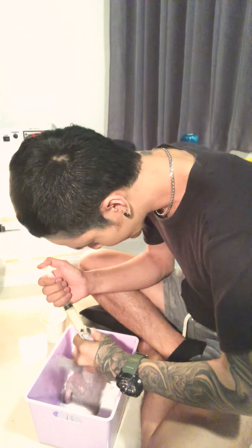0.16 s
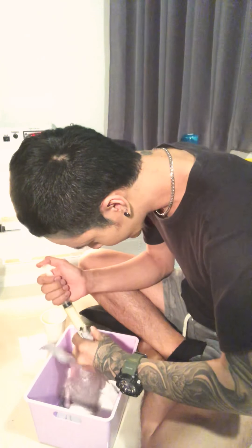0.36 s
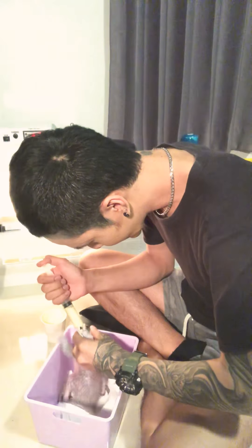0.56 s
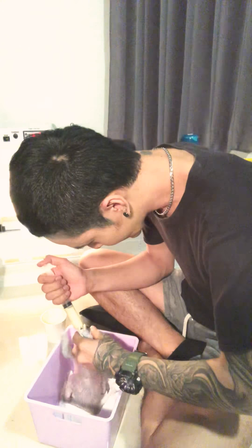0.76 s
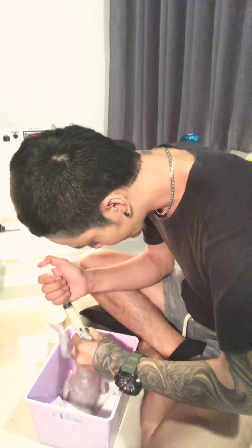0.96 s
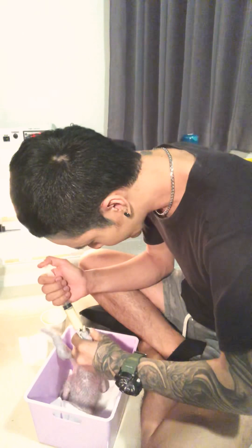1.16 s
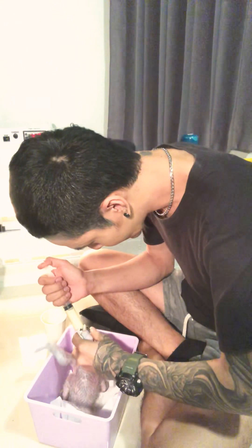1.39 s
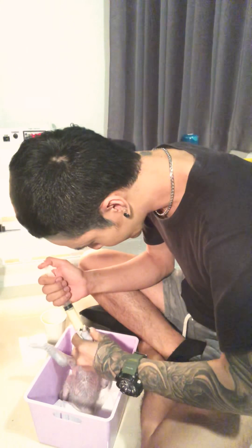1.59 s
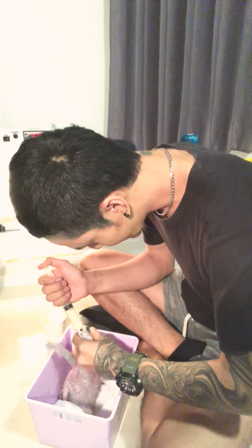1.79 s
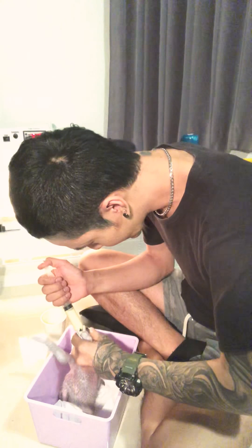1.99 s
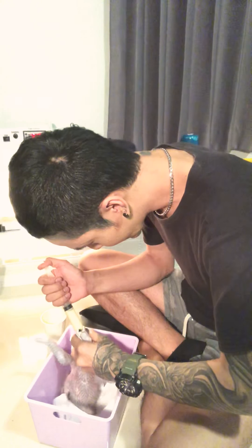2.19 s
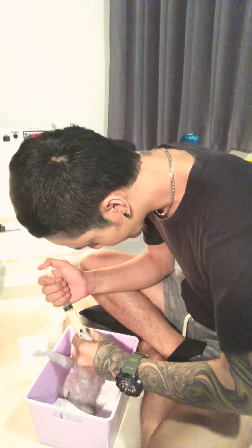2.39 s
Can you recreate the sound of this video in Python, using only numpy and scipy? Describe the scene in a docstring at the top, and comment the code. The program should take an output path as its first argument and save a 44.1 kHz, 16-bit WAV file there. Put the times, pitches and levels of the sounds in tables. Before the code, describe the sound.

A parrot chick lets out one loud, harsh, rasping squawk near the start, then claws and soft bumps knock a plastic tub, with small clicks and rustling bedding; close microphone, small quiet room.

```python
"""A small room with a plastic tub in it: a parrot chick gives one harsh, stuttering squawk while fed by hand.
Its voice is a train of uneven pulses and air puffs ringing in a throat, with two rising whistles laid in;
near the end the beak opens wide. Bumps and claws ring the tub wall as damped sines, beak and syringe tick as
resonant cracks of noise, and bedding rustles as grainy noise swells over a low bed of room noise."""
import sys
import numpy as np
from scipy import signal
from scipy.fft import rfft, irfft, next_fast_len
from scipy.io import wavfile
from scipy.ndimage import uniform_filter1d, map_coordinates

SR = 44100
rng = np.random.default_rng(int(sys.argv[2]) if len(sys.argv) > 2 else 0)


def output_pcm(signal):
    """Save a mono or channel-first signal as 16-bit PCM at the path in sys.argv[1].

    Samples are clipped to [-1, 1] before scaling.
    """
    pcm = np.clip(np.atleast_2d(signal).T, -1, 1) * 32767
    wavfile.write(sys.argv[1], SR, np.round(pcm).astype(np.int16))


N = 108045  # length in samples


def amp(db):
    """Decibels to gain."""
    return 10 ** (np.asarray(db) / 20)


def unit(x):
    """Scale to rms 1."""
    return x / np.sqrt(np.mean(x ** 2) + 1e-20)


def along(points, hz):
    """Read a curve of (f/Hz, value) points on a log frequency axis."""
    f, v = np.transpose(points)
    return np.interp(np.log(hz + 1), np.log(f + 1), v)


def clock():
    """Time of each sample in seconds."""
    return np.arange(N) / SR


def decay(t, t60):
    """An exponential die-away that falls 60 dB in t60 seconds."""
    return np.exp(-np.log(1000) * t / t60)


def wobble(rate):
    """A smooth random curve, rate knots a second."""
    return map_coordinates(rng.standard_normal(N // 8), [clock() * rate], mode="mirror")


def swell(centre, width, db):
    """A bell-shaped rise and fall; width is two standard deviations."""
    return amp(db) * np.exp(-2 * ((clock() - centre) / width) ** 2)


def coloured(x, points):
    """Shape x with a causal, minimum-phase filter through (f/Hz, gain/dB) points."""
    m = 2 * next_fast_len(N)
    cepstrum = irfft(np.log(amp(along(points, np.fft.rfftfreq(m, 1 / SR)))), m)
    # folding the cepstrum forward in time makes the filter causal
    cepstrum[1:m // 2] *= 2
    cepstrum[m // 2 + 1:] = 0
    return irfft(rfft(x, m) * np.exp(rfft(cepstrum)), m)[:N]


def ring(hz, db, t60):
    """A damped sine, one second long."""
    t = np.arange(SR) / SR
    return amp(db) * decay(t, t60) * np.sin(2 * np.pi * hz * t)


def tone(hz):
    """A sine of rms 1 that follows a pitch curve."""
    return np.sqrt(2) * np.sin(2 * np.pi * np.cumsum(hz) / SR)


def add(track, s, x):
    """Mix x into the track at time s."""
    part = track[round(s * SR):][:len(x)]
    part += x[:len(part)]


# colour of the room noise: f/Hz, relative level/dB
FLOOR_COLOUR = [(25, -20), (60, -3), (100, -3), (160, -6.5), (210, -0.5), (440, -7.5), (560, -13.5),
                (900, -17), (1600, -26), (2500, -26.5), (7500, -33), (9000, -39.5), (13500, -42),
                (16000, -44)]
FLOOR_DB = -59


def room_floor():
    """Steady noise weighted to the lows: the room's own bed."""
    return amp(FLOOR_DB) * unit(coloured(rng.standard_normal(N), FLOOR_COLOUR))


# how long the room holds each frequency: f/Hz, t60/s
ROOM_DECAY = [(100, 0.93), (400, 0.49), (1500, 0.24), (5000, 0.26), (14000, 0.27)]


def room(x):
    """A diffuse noise tail in which each frequency dies at its own speed."""
    hz, t, noise = signal.stft(rng.standard_normal(SR), SR, nperseg=256)
    fading = noise * decay(t, along(ROOM_DECAY, hz)[:, None])
    tail = signal.istft(fading, SR, nperseg=256)[1]
    build_up = 1 - np.exp(-np.arange(len(tail)) / (0.01 * SR))  # 10 ms time constant
    tail = tail * build_up
    return signal.fftconvolve(x, tail / np.linalg.norm(tail))[:N]


# low room modes: f/Hz, relative level/dB, t60/s
LOW_MODES = [(105.9, 3, 0.65), (220.5, -5.5, 0.17)]
BOOM_DB = -58


def boom(contacts):
    """Contacts with the tub and floor set the low room modes ringing."""
    modes = sum(ring(*mode) for mode in LOW_MODES)
    return amp(BOOM_DB) * signal.fftconvolve(contacts, modes)[:N]


# swells of bedding and wet food: centre t/s, width t/s, level/dB
RUSTLE_SWELLS = [(.42, 0.036, -50), (.567, .068, -51), (.708, .087, -59.5), (0.909, 0.099, -57.5),
                 (1.099, 0.14, -68), (1.27, 0.17, -67), (1.495, 0.0165, -65), (1.678, 0.039, -58),
                 (1.809, 0.066, -66), (1.891, 0.11, -63.5), (2.07, 0.14, -70), (2.234, .0393, -61.5),
                 (2.295, 0.016, -56), (2.434, 0.025, -66)]
# colour of the grains: f/Hz, relative level/dB
GRAIN_COLOUR = [(200, -7), (1200, 2.5), (2500, -1), (4200, -2.5), (7500, -7.5), (9000, -13.5),
                (12000, -13.5), (16000, -17.5)]
GRAIN_DB, GRAIN_RATE = 2.6, 800  # unevenness of the friction (dB), knots a second


def rustles():
    """Friction: coloured noise of uneven strength, brought up in swells."""
    friction = rng.standard_normal(N) * amp(GRAIN_DB * wobble(GRAIN_RATE))
    return unit(coloured(friction, GRAIN_COLOUR)) * sum(swell(*row) for row in RUSTLE_SWELLS)


# faint wet squeak: centre t/s, width t/s, peak level/dB, f/Hz at the centre, rise/(Hz per s)
WET_SQUEAK = (2.14, .03, -64.5, 5950, 8000)
SQUEAK_WAVER_HZ, SQUEAK_WAVER_RATE = 260, 600  # pitch scatter, knots a second


def squeak():
    """One thin sine that rises with a nervous pitch."""
    centre, width, db, hz, rise = WET_SQUEAK
    pitch = hz + rise * (clock() - centre) + SQUEAK_WAVER_HZ * wobble(SQUEAK_WAVER_RATE)
    return swell(centre, width, db) * np.sin(2 * np.pi * np.cumsum(pitch) / SR)


# beak and syringe: t/s, level before trim and colour/dB, f/Hz, t60/s, gain of ring over crack/dB
TICK_HITS = [(.1965, -38.5, 2020, 0.01, 18), (0.3093, -18.5, 7250, 0.01, 1.5),
             (.4236, -29, 2980, 0.017, 14), (.5147, -31.5, 4016, 0.0095, -1),
             (0.575, -22.5, 3000, 0.0086, -4), (.772, -48, 4300, .014, 14.5),
             (.783, -44.5, 5840, 0.017, -16), (0.881, -43, 4320, .02, 15.5),
             (1.6596, -39.5, 4410, 0.0084, 5.5), (1.679, -43.5, 6000, .012, -0.5),
             (1.7383, -48, 4200, 0.015, 6), (1.7904, -40.5, 1260, 0.032, 17.5),
             (1.831, -46, 6100, 0.038, 10), (2.2166, -44, 3840, 0.025, 17), (2.3435, -44, 6790, .007, -19)]
# colour of all the ticks: f/Hz, gain/dB
TICK_TONE = [(200, -21.5), (1000, 3.5), (3500, 3.5), (7500, -0.5), (9000, -7.5), (16000, -14.5)]
TICK_Q, TICK_TRIM_DB = 8.2, -4.5


def ticks():
    """Tiny cracks of dying noise, each with one broad resonance."""
    out, t = np.zeros(N), np.arange(SR // 10) / SR
    for s, db, hz, t60, ring_db in TICK_HITS:
        crack = rng.standard_normal(len(t)) * decay(t, t60)
        ping = signal.lfilter(*signal.iirpeak(hz, TICK_Q, SR), crack)
        add(out, s, amp(db + TICK_TRIM_DB) * (crack + amp(ring_db) * ping))
    return coloured(out, TICK_TONE)


# tub wall resonances: centre f/Hz before detuning, relative level/dB, t60/s
WALL_MODES = [(338, -12, 0.042), (531, 5, 0.033), (669, 2, 0.03), (973, 2.5, 0.026), (1118, 0.5, 0.04),
              (1440, 1.5, 0.0099), (1730, -10.5, 0.012)]
WALL_DETUNE = .07  # the pitches change with the place of contact (log scatter, about a share)


def wall():
    """One knock on the tub wall: damped modes of alternating sign, retuned each time."""
    knock = np.zeros(SR)
    for k, (hz, db, t60) in enumerate(WALL_MODES):
        detuned_hz = hz * np.exp(WALL_DETUNE * rng.standard_normal())
        knock += (-1) ** k * ring(detuned_hz, db, t60)
    return knock


# claws scrabbling on the tub wall: t/s, level/dB
CLAW_HITS = [(.586, -44), (.594, -43), (0.6057, -36), (0.62, -48), (.631, -55), (.657, -47)]


def claws():
    """Each claw stroke rings the tub wall alone."""
    out = np.zeros(N)
    for s, db in CLAW_HITS:
        add(out, s, amp(db) * wall())
    return out


# soft bumps on tub and floor: t/s, level before trims/dB, thud f/Hz, wall knock before trim/dB, thud t60/s
BUMP_HITS = [(.196, -43.5, 550, -11, 0.043), (0.274, -43.5, 228.5, -6, 0.13),
             (0.286, -43.5, 125.6, -26, 0.18), (.4135, -29.5, 583, 1, .025), (0.43, -29.5, 261, -5, 0.034),
             (.469, -33, 163, -5, 0.058), (.574, -30, 604, 1, 0.027), (.600, -32.5, 239, -3, 0.046),
             (.682, -47.5, 106, -32, 0.12), (0.851, -50.5, 110.5, -13, 0.19), (.829, -38, 504, -9.5, 0.031),
             (.927, -40.5, 218, -15, 0.076), (1.212, -34, 574, -15.5, 0.013),
             (1.217, -34.5, 182.5, -16, 0.027), (1.253, -56, 107, -41, .21),
             (1.888, -49.5, 127.4, -4, 0.35), (2.091, -48.5, 109.4, -32.5, .067),
             (2.297, -38.5, 252, -6.5, .029)]
THUD_RISE_CYCLES = 0.33  # the contact is soft, so the thud fades in over part of a cycle
THUD_TRIM_DB, KNOCK_TRIM_DB = 2.3, -4.0


def bumps():
    """Each bump is a soft dull thud plus the short ring of the tub wall."""
    out, t = np.zeros(N), np.arange(SR) / SR
    for s, db, hz, knock_db, t60 in BUMP_HITS:
        onset = 1 - np.exp(-(t * hz / THUD_RISE_CYCLES) ** 2)
        thud = onset * ring(hz, THUD_TRIM_DB, t60)
        add(out, s, amp(db) * (thud + amp(knock_db + KNOCK_TRIM_DB) * wall()))
    return out


TUB_DB, TUB_T60, TUB_TOP_HZ = -1.5, 0.015, 7000  # echo level, die-away in s, low-pass corner


def in_tub(x):
    """The direct sound plus a short dense cluster of dull echoes between the tub walls."""
    t = np.arange(SR // 20) / SR
    echoes = rng.standard_normal(len(t)) * decay(t, TUB_T60) * (t > .0005)
    dull = signal.butter(2, TUB_TOP_HZ, fs=SR, output="sos")
    echoes = signal.sosfilt(dull, echoes / np.linalg.norm(echoes))
    return unit(x + amp(TUB_DB) * signal.fftconvolve(x, echoes)[:N])


STEADY_S = .008  # span of each of the two averaging passes


def steady(x):
    """Hold the strength near constant from moment to moment, keeping the fine grain."""
    size = max(3, int(STEADY_S * SR))
    power = uniform_filter1d(uniform_filter1d(x ** 2, size), size)
    return x / np.sqrt(np.abs(power) + 1e-9)


PULSE_HZ, JITTER, SCATTER_DB = 429.1, .4, 0.85  # mean rate, timing scatter in cycles, size scatter
AIR_SHARE, PUFF_S = .45, 0.0018  # share of air in the power, time constant of a puff


def voice_source():
    """Pulses of uneven timing and size, each followed by a puff of air."""
    chance = rng.standard_normal((2048, 2))
    cycles = np.arange(len(chance)) + JITTER * chance[:, 0]
    at = (cycles / PULSE_HZ * SR).clip(0, N).astype(int)
    pulses = np.bincount(at, amp(SCATTER_DB * chance[:, 1]), N + 1)[:N]
    puffs = signal.lfilter([1], [1, -np.exp(-1 / (PUFF_S * SR))], pulses)
    air = unit(puffs * rng.standard_normal(N))
    return np.sqrt(1 - AIR_SHARE) * unit(pulses - pulses.mean()) + np.sqrt(AIR_SHARE) * air


# sharp throat resonances: f/Hz, width f/Hz, level/dB
THROAT_PEAKS = [(2500, 290, -7), (3180, 110, 0), (3790, 110, -2)]
# throat colour with the beak nearly shut: f/Hz, relative level/dB
SHUT_COLOUR = [(100, -36.5), (420, -14.5), (640, -29), (850, -9.5), (1130, -4), (1600, -5), (1800, -8),
               (2100, 2.5), (2550, -3.5), (2900, -7), (4000, -8.5), (4400, -12.5), (8200, -20.5),
               (8900, -39.5), (10200, -26), (13000, -29), (16000, -41.5)]
# throat colour with the throat narrowed: f/Hz, relative level/dB
NARROW_COLOUR = [(100, -36), (430, -22), (700, -30.5), (1000, -9.5), (1450, 6.5), (2300, -4), (4000, -5),
                 (4700, -12.5), (8000, -19), (9000, -29), (13000, -31.5), (16000, -44.5)]
# throat colour with the beak wide open: f/Hz, relative level/dB
OPEN_COLOUR = [(100, -33.5), (500, -13.5), (650, -22), (820, -2), (1550, -2.5), (2100, 1), (2600, -8.5),
               (4000, -7.5), (6000, -13), (8000, -22), (9000, -25.5), (12500, -28), (16000, -39.5)]
THROAT_WAVER, THROAT_RATE = .035, 70  # scatter of the speed (share), knots a second
NARROW_S, NARROWING_S = .305, 0.0092  # when and how fast the throat narrows
OPEN_S, OPENING_S = .343, .005  # when and how fast the beak opens


def rasp():
    """The pulses ring in a restless throat, which narrows before the beak opens wide."""
    t, source = clock(), voice_source()
    ringing = source.copy()
    for hz, width, db in THROAT_PEAKS:
        ringing += amp(db) * signal.lfilter(*signal.iirpeak(hz, hz / width, SR), source)
    # uneven playing speed makes the pulses and resonances waver together
    playhead = np.cumsum(1 + THROAT_WAVER * wobble(THROAT_RATE))
    ringing = map_coordinates(ringing, [playhead], mode="mirror")
    narrow = .5 + .5 * np.tanh((t - NARROW_S) / NARROWING_S)
    beak = .5 + .5 * np.tanh((t - OPEN_S) / OPENING_S)
    shut_voice = unit(coloured(in_tub(ringing), SHUT_COLOUR))
    narrow_voice = unit(coloured(in_tub(ringing), NARROW_COLOUR))
    open_voice = unit(coloured(in_tub(source), OPEN_COLOUR))
    closed_voice = (1 - narrow) * shut_voice + narrow * narrow_voice
    return steady((1 - beak) * closed_voice + beak * open_voice)


WHISTLE_WAVER, WAVER_RATE = .048, 600  # pitch scatter (share), knots a second


def waver():
    """A fresh nervous pitch factor around 1."""
    return 1 + WHISTLE_WAVER * wobble(WAVER_RATE)


# two whistling strands: t/s, upper f/Hz, upper level/dB, lower level/dB (levels relative to the rasp)
WHISTLE_STRANDS = [(.215, 1500, -11.5, -3), (.262, 1520, -5.5, -10.5), (.283, 1500, -13, -7.5),
                   (.298, 1447, -11.5, -4), (.313, 1463, -2, 3.5), (.325, 1513, 5, -11.5),
                   (.341, 1571, 0, -4.5), (.356, 1591, -10.5, -10.5)]
LOWER_HZ, LOWER_RISE = 1116.5, 560  # the lower strand's pitch at the first row, and its climb in Hz per s


def whistles():
    """Two wavering sines trade places in level; the lower climbs in a straight line."""
    t = clock()
    s, *columns = np.transpose(WHISTLE_STRANDS)
    upper_hz, upper_db, lower_db = [np.interp(t, s, column) for column in columns]
    lower_hz = LOWER_HZ + LOWER_RISE * (t - s[0])
    upper = amp(upper_db) * tone(upper_hz * waver())
    lower = amp(lower_db) * tone(lower_hz * waver())
    return upper + lower


# falling tones under the rasp and at its end: centre t/s, width t/s, level/dB, centre f/Hz, sag/(Hz per s)
SAGGING_TONES = [(.255, 0.06, -45.5, 413.7, 445.7), (.364, .028, -39.5, 388.1, 5000)]


def low_tones():
    """Wavering sines whose pitch sags as they swell and fade."""
    out = np.zeros(N)
    for centre, width, db, hz, sag in SAGGING_TONES:
        pitch = hz - sag * (clock() - centre)
        out += swell(centre, width, db) * tone(pitch * waver())
    return out


# surges of effort: centre t/s, width t/s, level/dB
EFFORT_SURGES = [(0.1987, 0.0038, -38.5), (.211, 0.0044, -36), (0.22, 0.0074, -24.5), (0.241, .013, -25.5),
                 (.263, .012, -24), (.285, 0.012, -18.5), (0.297, .008, -21), (.312, .01, -26),
                 (0.323, .01, -26.5), (0.339, 0.011, -23.5), (0.349, 0.0094, -19), (0.361, 0.013, -20),
                 (.372, 0.01, -25.5)]


def squawk():
    """Surges of effort, summed in power, drive the rasp and whistles; low tones lie beneath."""
    effort = np.sqrt(sum(swell(*row) ** 2 for row in EFFORT_SURGES))
    return effort * (rasp() + whistles()) + low_tones()


CALL_WET_DB, HANDLING_WET_DB = -10, -8  # room tail under the squawk and under the handling


def scene():
    """Chick and handling in the room; bumps and claws also wake its low modes."""
    call, contacts = squawk(), bumps() + claws()
    handling = contacts + ticks() + rustles() + squeak()
    wet = amp(CALL_WET_DB) * room(call) + amp(HANDLING_WET_DB) * room(handling)
    return (call + handling + wet + boom(contacts) + room_floor())[None]


LOW_CUT_HZ, TOP_HZ = 48, 15950


def record(dry):
    """Thin the deep bass with a high-pass and keep nothing above the band limit."""
    m = 2 * next_fast_len(N)
    thin = signal.sosfilt(signal.butter(3, LOW_CUT_HZ, "high", fs=SR, output="sos"), dry)
    in_band = np.fft.rfftfreq(m, 1 / SR) < TOP_HZ
    return irfft(rfft(thin, m) * in_band, m)[:, :N]


dry = scene()
out = record(dry)
output_pcm(out)
```